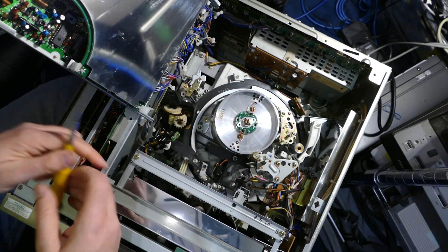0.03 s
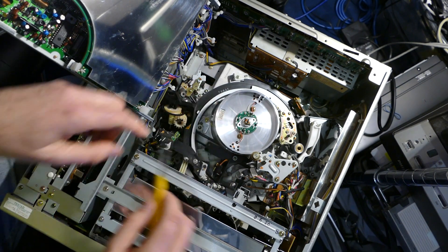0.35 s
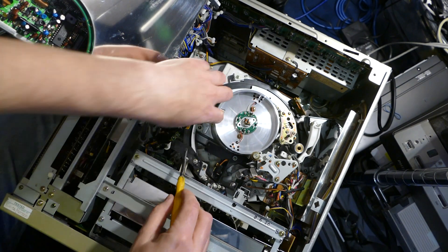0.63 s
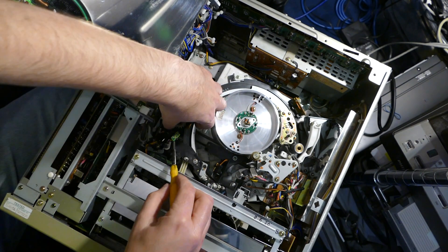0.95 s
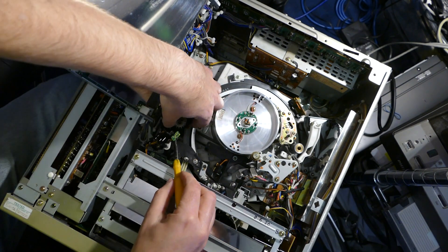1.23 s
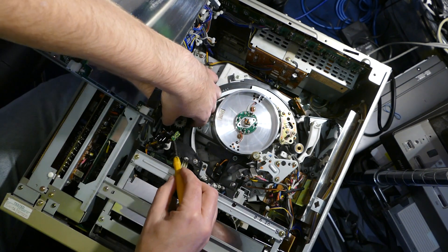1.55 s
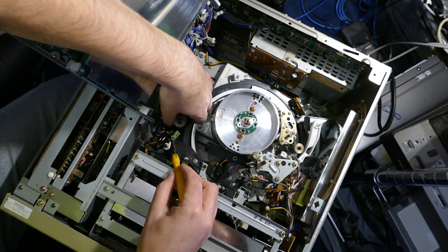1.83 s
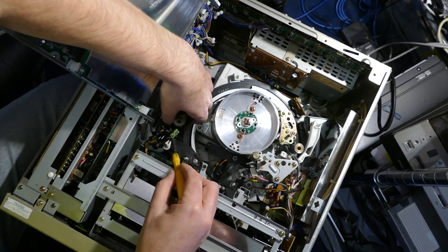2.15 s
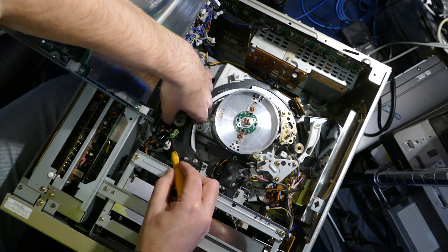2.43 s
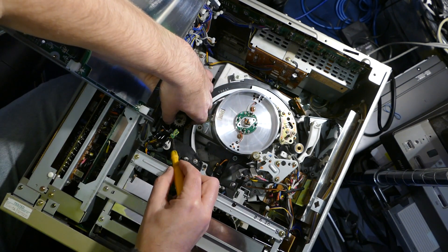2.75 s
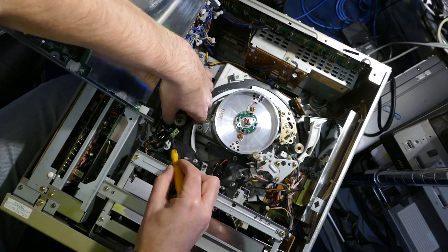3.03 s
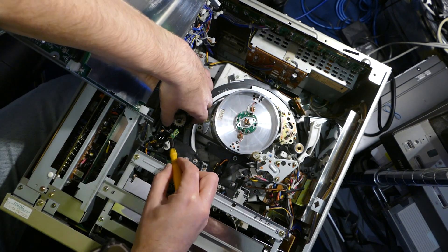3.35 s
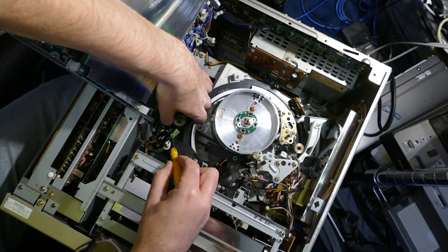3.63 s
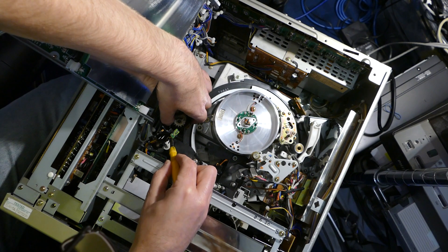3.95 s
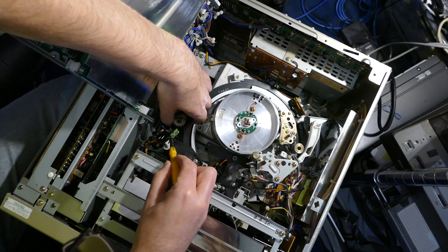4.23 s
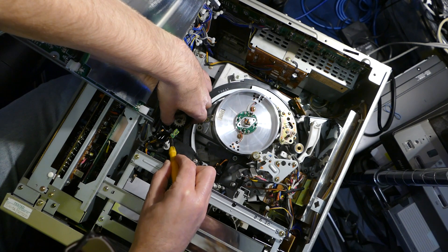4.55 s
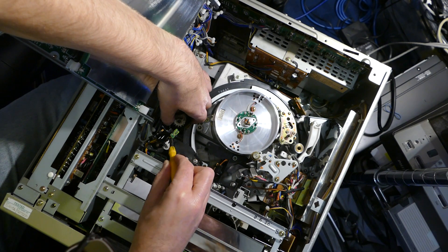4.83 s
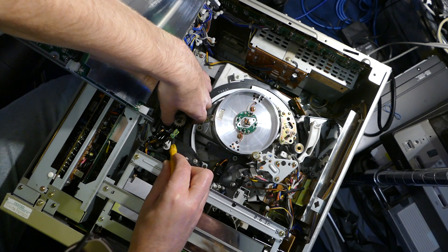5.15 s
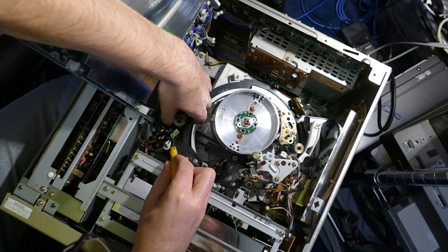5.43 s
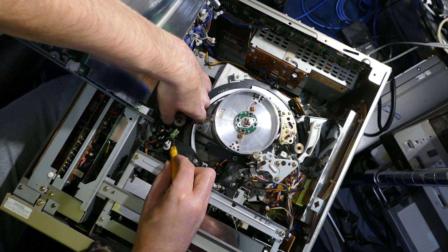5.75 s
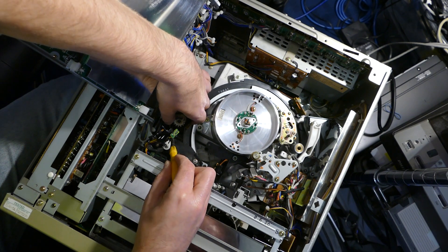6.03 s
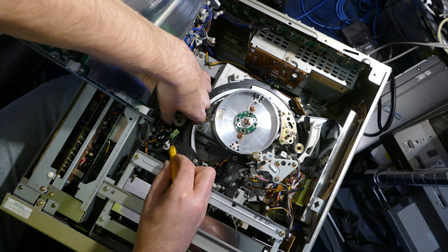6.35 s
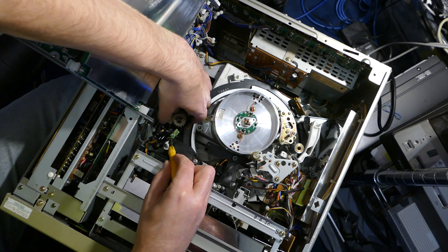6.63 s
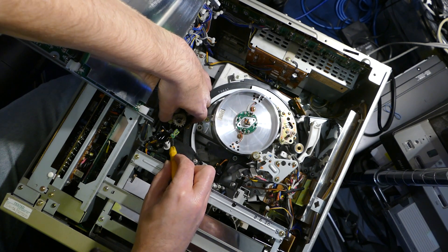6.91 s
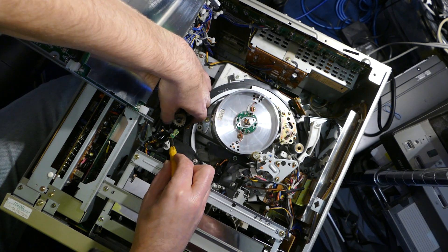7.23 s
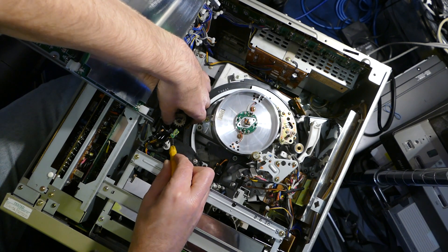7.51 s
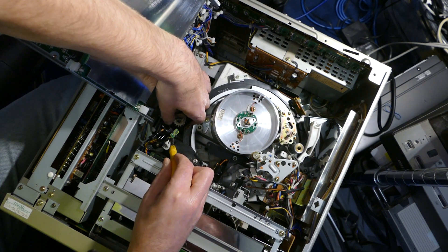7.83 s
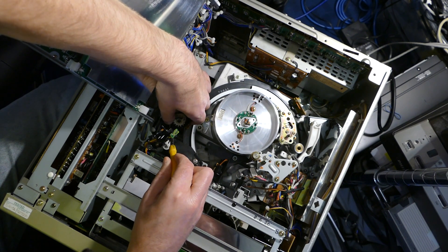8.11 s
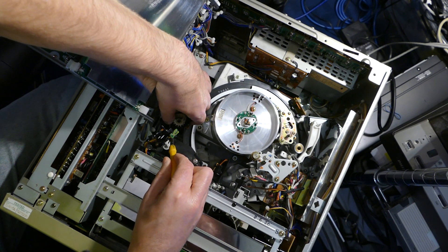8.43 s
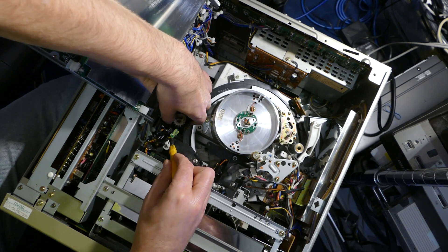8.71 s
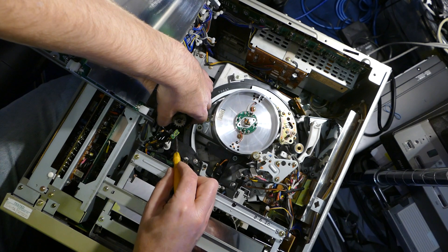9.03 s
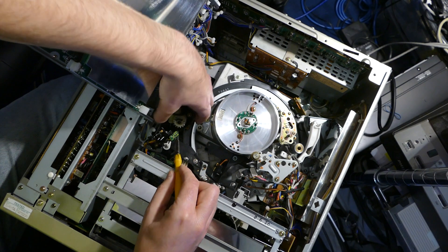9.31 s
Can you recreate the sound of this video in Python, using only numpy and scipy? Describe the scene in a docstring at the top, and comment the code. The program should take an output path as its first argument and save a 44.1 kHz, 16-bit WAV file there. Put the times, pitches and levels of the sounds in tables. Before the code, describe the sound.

A screwdriver clicks, snaps and scrapes against steel parts inside an open video recorder, over a steady fan and low hum.

```python
"""Stiff lever in a tape deck

Close to the microphone, in a small workshop, a hand and a screwdriver work a lever in an open video
recorder. Steel parts snap against their stops or scrape briefly; each contact rings the deck and dies
away in the room. Heavy blows knock the chassis and fingers rub the metal.
A fan, a thin whine and a low hum run steadily behind."""
import sys
import numpy as np
from scipy import signal
from scipy.fft import rfft, irfft, next_fast_len
from scipy.io import wavfile

SR = 44100
rng = np.random.default_rng(int(sys.argv[2]) if len(sys.argv) > 2 else 0)


def bounce(signal):
    """Save signal as a 16-bit WAV file at the path given by the first command-line argument."""
    frames = np.transpose(np.atleast_2d(signal))
    limited = np.clip(frames, -1, 1)
    pcm = np.round(limited * 32767).astype(np.int16)
    wavfile.write(sys.argv[1], SR, pcm)


N = 413437
RING_SAMPLES = 22050

# Steel on steel, close up: (time [s], scrape length [s], strength [dB], spot [dB], edge [dB])
# A length near zero is a snap. Spot: + ringing lever, - clacking bracket. Edge: + sharp, - blunt.
STEEL_CONTACTS = [ (0.061, 0.0026, -74, -3, 9), (0.369, .004, -75.5, 7, -10),
                  (0.646, 0.0036, -64.5, 1, -13), (.78, 0.0037, -74, 5, -10), (1.070, .002, -52, -4, -5),
                  (1.072, 0.015, -46.5, -3, -2), (1.181, .002, -67, -7, -1), (1.183, 0.021, -58.5, -4, 0),
                  (1.358, 0.0018, -65.5, -8, -2), (1.362, 0.02, -59.5, -3, 6), (1.415, .0005, -72, -9, -6),
                  (1.621, 0.047, -67.5, 3, 3), (1.899, 0.018, -62.5, -3, -4), (1.918, 0.012, -57, -3, -5),
                  (2.034, 0.0089, -68, -7, 4), (3.154, 0.0075, -58, 6, -8), (3.164, .012, -45, 5, 3),
                  (3.174, 0.0028, -50, 5, 8), (3.197, .001, -56, 5, 0), (3.309, 0.012, -59.5, -6, -24),
                  (4.114, 0.003, -64.5, -4, 1), (4.193, 0.00055, -68.5, 0, 9), (5.093, 0.0028, -40, 7, 9.5),
                  (5.100, 0.00032, -36.5, -0.5, -8), (5.199, 0.0009, -51.5, 3, -2),
                  (5.537, 0.024, -64, 0, -5), (6.085, 0.0039, -69.5, 4, 0), (6.567, 0.011, -59, -5, -10),
                  (6.577, 0.0026, -52, 1, -3), (6.580, 0.00018, -39.5, 3.5, -7),
                  (6.591, 0.02, -46.5, 0.5, 6.5), (6.615, 0.0035, -53, 4, 0), (6.674, .003, -63, 5, -6),
                  (6.803, 0.0055, -59, 3, 4), (7.359, 0.0063, -63, 1, -11), (7.617, .002, -61, 2, -6),
                  (7.621, 0.003, -54, 1.5, 1), (7.651, .006, -64, 6, 1), (8.525, 0.0015, -53.5, -4, 0),
                  (8.5355, 0.0003, -43, 0, -12), (8.543, 0.0011, -52, -2, -9), (8.608, .001, -58.5, -5, 0),
                  (8.610, 0.016, -57.5, -3.5, 5), (8.863, 0.033, -62.5, -4, -6),
                  (8.894, 0.0059, -44.5, -2.5, -6), (8.899, 0.02, -43.5, 4, 6),
                  (9.064, 0.01, -59.5, -5.5, 5), (9.185, 0.015, -64, -2, -8)]
# The deck's five bands: chassis thud, bracket clack, lever ring, tip tick, edge snap
# (low [Hz], high [Hz], clatter t60 [s], room t60 [s], room level [dB])
BANDS = [(294, 990, 0.062, 0.25, 1), (1260, 2920, 0.035, 0.2, -2), (3300, 7000, 0.025, 0.19, 0),
         (8280, 12100, 0.027, 0.18, -4), (12700, 15400, 0.016, 0.15, -6)]
# How strongly each band answers: (gain [dB])
BAND_GAINS = (0, -0.5, -0.5, -0.5, -18.5)
# How much of a contact's spot goes to each band: (share [ratio])
BAND_SPOT_SHARES = (-0.38, -0.95, 0.86, -0.56, -0.2)
# How much of a contact's edge goes to each band: (share [ratio])
BAND_EDGE_SHARES = (0.013, 0, 0.11, 0.63, 1.3)
# Harder, shorter contacts are brighter; one of EVEN_DB and EVEN_S has no tilt.
EVEN_DB, EVEN_S, PIVOT_HZ = -56.5, 0.011, 4220
TILT_PER_DB, TILT_PER_HALVING = 0.1724, 0.41  # dB/octave per dB of strength, per halving of length
# Modes of the open deck: (frequency [Hz], relative level [dB], t60 [s])
DECK_MODES = [(335.5, -16.5, 0.14), (437, -20, 0.036), (660, -22, 0.26), (873, -23, 0.2), (1252, -29, 0.11),
              (1452, -25.5, 0.14), (1623, -22.5, 0.09), (2014, -20, 0.12), (3023, -28, 0.08),
              (3530, -26, 0.12), (4030, -21, 0.17), (5170, -30, 0.11), (5410, -26, 0.1), (5600, -29, 0.1),
              (6060, -25, .1), (6230, -25, 0.09), (6830, -16, 0.08), (9200, -23, .1), (9420, -24, 0.083),
              (10100, -22, .07), (10500, -23, 0.08), (13300, -19, .11), (14430, -25, .1)]
# Modes of the freed lever: (frequency [Hz], relative level [dB], t60 [s])
LEVER_MODES = [(3950, -5, 0.24), (4200, -1, 0.27), (4425, -3, .2), (4924, -5, .16), (5220, -2, .14),
               (5450, 4, .15), (5500, 2, .15), (5988, -5, .12), (6320, -4, .12), (6470, -6, .12),
               (6770, -7, .09)]
# Struck plates and brackets, one note each: (time [s], frequency [Hz], level [dB])
PART_NOTES = [(.649, 3670, -62.5), (.650, 5200, -64), (1.078, 1880, -54), (1.080, 4030, -55),
              (1.365, 830, -60), (1.368, 2000, -56), (1.922, 953, -52), (1.923, 3490, -61),
              (2.038, 945, -59), (3.170, 660, -46), (3.171, 390, -51), (3.312, 1600, -53),
              (3.312, 2350, -62), (3.313, 3520, -60), (3.313, 954, -56.5), (5.100, 2320, -44.5),
              (5.102, 1506, -44.5), (5.101, 935, -56), (5.101, 400, -55), (6.579, 5150, -37),
              (6.580, 3590, -48), (6.581, 830, -46), (6.580, 423, -46), (6.581, 1410, -48.5),
              (7.623, 960, -56), (7.623, 1750, -59), (8.536, 2365, -44.5), (8.537, 1604, -50),
              (8.537, 3070, -49), (8.610, 1260, -57), (8.895, 870, -52.5), (8.895, 1500, -55),
              (8.906, 5620, -44), (9.067, 2030, -54), (9.068, 840, -64), (9.190, 940, -57.5)]
# The lever lands on its stop and knocks the chassis: (time [s], level [dB])
CHASSIS_KNOCKS = [(1.078, -58), (1.372, -57), (1.918, -57), (3.169, -46), (5.100, -57), (6.580, -45),
                  (6.612, -54), (7.622, -66), (8.895, -49.5), (9.066, -61)]
# The hand bumps the chassis softly: (time [s], level [dB])
HAND_BUMPS = [(1.205, -56), (3.185, -56), (5.985, -51.5), (6.651, -52.5), (8.932, -49.5)]
# Fingers stroke the metal: (middle [s], length [s], level [dB])
FINGER_STROKES = [(.45, 0.96, -85), (1.4, .7, -82), (5.35, 0.29, -80), (6.0, 0.44, -82), (8.76, .33, -70),
                  (9.32, 0.24, -72)]
# Air noise of fan and room: (frequency [Hz], relative density [dB])
AIR_SPECTRUM = [(25, -33.5), (75, -19), (105, -9.5), (150, -4.5), (310, 0.5), (430, -4.5), (680, -6),
                (780, -9.5), (890, -8.5), (1000, -12.5), (1200, -11), (2050, -13.5), (3200, -22.5),
                (3850, -27.5), (4400, -27), (4750, -31), (5100, -26.5), (5600, -27), (7800, -32.5),
                (9800, -29), (15500, -41)]
# Stereo width of that air at the microphone: (frequency [Hz], side minus mid [dB])
AIR_STEREO_WIDTH = [(25, -6), (60, -12), (140, -20.5), (280, -24), (500, -7), (1200, -5), (3000, -6.5),
                    (12000, -2.5)]
# Narrow resonances in the air noise:
# (centre [Hz], width [Hz], level [dB], side minus mid [dB], left minus right [dB])
FAN_RESONANCES = [(250.3, 4.2, -72, -29, -4.5), (329, 9.5, -71.5, -18, -14), (388.4, 21, -67, -20, -9.5),
                  (503.5, 40, -69.5, -11, 0.5), (602.4, 7, -70.5, 0, -3.5), (656.5, 32, -68, -3.5, 10),
                  (894, 38, -75, 0, 0), (1156, 19, -75, -8, 12), (1442, 45, -78, -9, 4),
                  (3510, 150, -83.5, -5, 0)]
# Two narrow notches that the camera filters out of the sound: (centre [Hz], width [Hz])
CAMERA_NOTCHES = [(568, 63), (2668, 39)]


def contacts():
    """Right at the microphone, each snap or scrape drives the deck's five bands; the room answers."""
    t, out = np.arange(RING_SAMPLES) / SR, np.zeros((2, N))
    filters = [bandpass(2, low, high) for low, high, *_ in BANDS]
    for start, length, strength_db, spot_db, edge_db in STEEL_CONTACTS:
        levels = band_levels(length, strength_db, spot_db, edge_db)
        force = contact_force(t, length)
        modes, clatter = deck(t)
        echoes = workshop(t)
        for k, (_, _, t60, room_t60, room_db) in enumerate(BANDS):
            direct = modes + unit(clatter * fade(t, t60))
            room = undb(room_db) * unit(echoes * fade(t, room_t60))
            driven = signal.fftconvolve(direct + room, force[None])[:, :RING_SAMPLES]
            polarity = (-1) ** k  # joins neighbouring bands in phase
            place(out, start, polarity * signal.sosfilt(filters[k], driven), levels[k])
    return out


def contact_force(t, length, catch_db=5, slips_per_s=3200, uneven_db=3, bite_s=0.034, rise_share=0.25):
    """Steel catches once, then slips in tiny uneven steps for as long as the parts slide."""
    slips = rng.random(len(t)) < slips_per_s / SR
    direction, size = rng.standard_normal((2, len(t)))
    force = slips * np.sign(direction) * undb(uneven_db * size)
    progress = t / max(length, 1e-4)
    force *= (1 - np.exp(-progress / rise_share)) * np.exp(-progress ** 4)
    force[0] = undb(catch_db) * np.exp(-length / bite_s)  # long scrapes start gently
    return force


def band_levels(length, strength_db, spot_db, edge_db):
    """Force and brevity lift the treble, the spot trades clack for ring, a sharp edge adds top."""
    halvings = np.log2(EVEN_S / max(length, 1e-4))
    tilt = TILT_PER_DB * (strength_db - EVEN_DB) + TILT_PER_HALVING * halvings
    octaves = np.log2([np.sqrt(low * high) / PIVOT_HZ for low, high, *_ in BANDS])
    timbre_db = spot_db * np.array(BAND_SPOT_SHARES) + edge_db * np.array(BAND_EDGE_SHARES)
    return strength_db + np.array(BAND_GAINS) + tilt * octaves + timbre_db


def deck(t, crack_db=-3.5, modes_db=0.5, vary_db=1.5, detune=0.004, side_db=-10):
    """A blow gives a crack with modes that vary with spot and grip, and raw noise for the clatter."""
    draws = rng.standard_normal((len(DECK_MODES), 4))
    modes = 0
    for (hz, db, t60), (strength, phase, across, grip) in zip(DECK_MODES, draws):
        ring = mode(t, hz * (1 + detune * grip), t60, phase, across * undb(side_db))
        modes += undb(db + modes_db + vary_db * strength) * unit(ring)
    modes[:, 0] += undb(crack_db)
    clatter = stereo(*rng.standard_normal((2, len(t))), side_db)
    return modes, clatter


def lever(start_s=5.094, level_db=-36.5, rise_s=0.001, side_db=-8):
    """The lever springs free once and rings with a cluster of steel modes."""
    t, out = np.arange(RING_SAMPLES) / SR, np.zeros((2, N))
    ring = 0
    for hz, db, t60 in LEVER_MODES:
        phase, across = rng.standard_normal(2)
        ring += undb(db) * unit(mode(t, hz, t60, phase, across * undb(side_db)))
    place(out, start_s, ring * (1 - np.exp(-t / rise_s)), level_db)
    return out


def struck_parts(t60=0.047, rise_s=0.00049, room_t60=0.13, room_db=-3, width_share=0.097, side_db=-9):
    """A struck plate or bracket gives one short hollow note; the room answers around that pitch."""
    t, out = np.arange(RING_SAMPLES) / SR, np.zeros((2, N))
    for start, hz, db in PART_NOTES:
        phase, across = rng.standard_normal(2)
        note = mode(t, hz, t60, phase, across * undb(side_db)) * (1 - np.exp(-t / rise_s))
        resonance = signal.iirpeak(hz, 1 / width_share, fs=SR)
        echoes = signal.lfilter(*resonance, workshop(t) * fade(t, room_t60))
        place(out, start, unit(note) + undb(room_db) * unit(echoes), db)
    return out


def knocks(low_hz=330, high_hz=760, t60=0.04, room_t60=0.32, room_db=-4):
    """A heavy blow sets the chassis plates thudding and carries into the workshop."""
    t, out = np.arange(RING_SAMPLES) / SR, np.zeros((2, N))
    plates = bandpass(3, low_hz, high_hz)
    for start, db in CHASSIS_KNOCKS:
        _, clatter = deck(t)
        direct = unit(clatter * fade(t, t60))
        room = undb(room_db) * unit(workshop(t) * fade(t, room_t60))
        place(out, start, signal.sosfilt(plates, direct + room), db)
    return out


def hand_bumps(low_hz=285, high_hz=385):
    """Flesh pushes slowly, so only the lowest mode of the deck sounds."""
    t, out = np.arange(RING_SAMPLES) / SR, np.zeros((2, N))
    soft = bandpass(2, low_hz, high_hz)
    for start, db in HAND_BUMPS:
        modes, _ = deck(t)
        place(out, start, signal.sosfilt(soft, modes), db)
    return out


def fingers(centre_hz=10200, skirt_db=-12, grain_db=4, uneven_db=1.5, grip_db=-87):
    """Skin on metal, close up: a grainy hiss swells with each stroke over the creep of the grip."""
    def spectrum(hz):
        octaves = np.log2((hz + 1) / centre_hz)
        return np.exp(-(octaves / 0.38) ** 2) + undb(skirt_db) * np.exp(-(octaves / 1.3) ** 2)

    t = np.arange(N) / SR
    hiss = stereo(noise(spectrum), noise(spectrum), side_db=-5)
    hiss *= undb(grain_db * drift(rate_hz=400) + uneven_db * drift(rate_hz=13))
    strokes = sum(undb(db) * np.exp(-(2 * (t - middle) / length) ** 2)
                  for middle, length, db in FINGER_STROKES)
    return at_level(hiss, 0) * (undb(grip_db) + strokes)


def workshop(t, build_s=0.0058, side_db=-3):
    """Dense reflections from bench and walls build up at the microphone within milliseconds."""
    mid, side = rng.standard_normal((2, len(t)))
    return stereo(mid, side, side_db) * (1 - np.exp(-(t / build_s) ** 2))


def fan(air_db=-55.5, waver_db=0.6, flutter_db=0.9):
    """Behind the work, broad air noise, centred in the bass, with narrow resonances that flutter."""
    mid = noise(lambda hz: colour(AIR_SPECTRUM, hz))
    side = noise(lambda hz: colour(AIR_SPECTRUM, hz) * colour(AIR_STEREO_WIDTH, hz))
    out = at_level(stereo(mid, side), air_db) * undb(waver_db * drift(rate_hz=1.3))
    for centre, width, db, side_db, pan_db in FAN_RESONANCES:
        whirr = stereo(narrow_noise(centre, width), narrow_noise(centre, width), side_db)
        flutter = undb(flutter_db * drift(rate_hz=30))
        out += at_level(whirr * pan(pan_db) * flutter, db)
    return out


def whine(centre_hz=2809, width_hz=139, level_db=-68, waver_hz=16, flutter_db=2.2):
    """A thin band of noise, a little left of the microphone, flutters and wavers in pitch."""
    phase = 2 * np.pi * np.cumsum(centre_hz + waver_hz * drift(rate_hz=30)) / SR
    mid, side = (narrow_noise(0, width_hz) * np.cos(phase) + narrow_noise(0, width_hz) * np.sin(phase)
                 for _ in range(2))
    flutter = undb(flutter_db * drift(rate_hz=50))
    return at_level(stereo(mid, side, side_db=-18) * pan(db=4) * flutter, level_db)


def motor_hum(pitch_hz=125, level_db=-66.5, wander_hz=1.252, throb_db=2.5):
    """Dead centre and under everything, a motor hums, wavering in pitch and strength."""
    phase = 2 * np.pi * np.cumsum(pitch_hz + wander_hz * drift(rate_hz=3.73)) / SR
    throb = undb(throb_db * drift(rate_hz=16))
    return at_level(np.sin(phase) * throb, level_db)


def mode(t, hz, t60, phase_cycles, offset_rad):
    """One decaying mode that reaches left and right in different phases."""
    sides = np.array([[1], [-1]]) * offset_rad
    return np.sin(2 * np.pi * (hz * t + phase_cycles) + sides) * fade(t, t60)


def place(out, start, sound, db, span_s=0.023):
    """Add a short sound; its level is the rms it would have over span_s."""
    i = int(start * SR)
    out[:, i:i + RING_SAMPLES] += (undb(db) * np.sqrt(span_s * SR) * unit(sound))[:, :N - i]


def noise(gain):
    """Steady noise with the spectrum gain(Hz)."""
    size = next_fast_len(N, True)
    hz = np.arange(size // 2 + 1) * SR / size
    return irfft(rfft(rng.standard_normal(size)) * gain(hz), size)[:N]


def narrow_noise(centre_hz, width_hz):
    """A flat-topped band of noise."""
    return noise(lambda hz: 1 / (1 + ((hz - centre_hz) / (width_hz / 2)) ** 4))


def drift(rate_hz):
    """Smooth random drift with an rms of one."""
    return at_level(noise(lambda hz: np.exp(-(hz / rate_hz) ** 2)), 0)


def colour(points, hz):
    """Gain of a (frequency [Hz], level [dB]) curve at the given frequencies."""
    points_hz, points_db = np.transpose(points)
    return undb(np.interp(np.log(hz + 1), np.log(points_hz), points_db))


def bandpass(order, low_hz, high_hz):
    """Sections of a band-pass filter."""
    return signal.butter(order, [low_hz, high_hz], btype="band", fs=SR, output="sos")


def fade(t, t60):
    """Exponential decay by 60 dB in t60."""
    return np.exp(-np.log(1000) * t / t60)


def stereo(mid, side, side_db=0):
    """Left and right from mid and side."""
    side = undb(side_db) * side
    return np.array([mid + side, mid - side])


def pan(db):
    """Channel gains that put the left db above the right."""
    return undb(np.array([[db], [-db]]) / 2)


def at_level(x, db):
    """Set the rms level."""
    return x * undb(db) / np.sqrt(np.mean(x ** 2))


def unit(x):
    """Scale to a mean energy of one per channel."""
    return x / np.sqrt(np.mean(np.sum(x ** 2, axis=-1)) + 1e-30)


def undb(db):
    """Decibels to gain."""
    return 10 ** (np.asarray(db) / 20)


def scene():
    """The deck up close, a shade right of centre, with the steady room behind."""
    work = contacts() + lever() + struck_parts() + knocks() + hand_bumps() + fingers()
    return work * pan(db=-0.3) + fan() + whine() + motor_hum()


def record(dry):
    """The camera filters two narrow notches out of the sound, and the top is cut steeply."""
    for hz, width in CAMERA_NOTCHES:
        dry = signal.lfilter(*signal.iirnotch(hz, hz / width, fs=SR), dry)
    top_cut = signal.ellip(N=10, rp=0.2, rs=70, Wn=15800, fs=SR, output="sos")
    return signal.sosfilt(top_cut, dry)


dry = scene()
out = record(dry)
bounce(out)
```